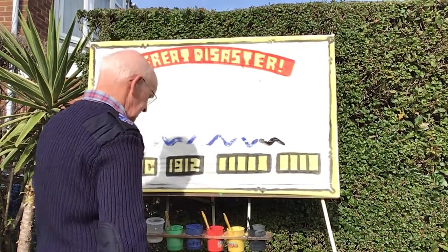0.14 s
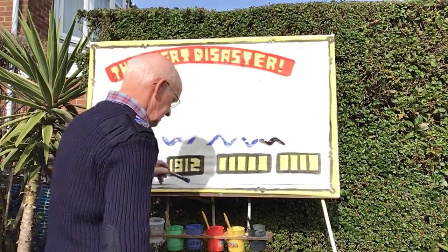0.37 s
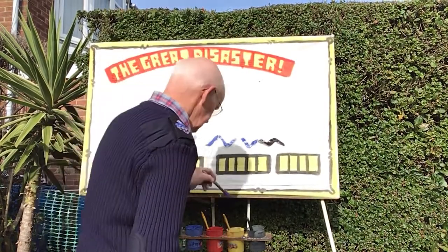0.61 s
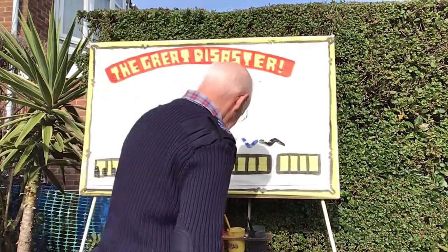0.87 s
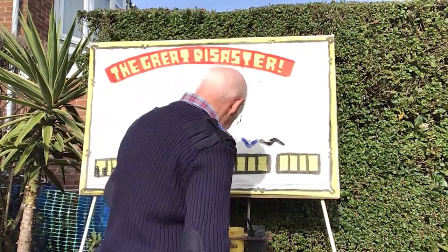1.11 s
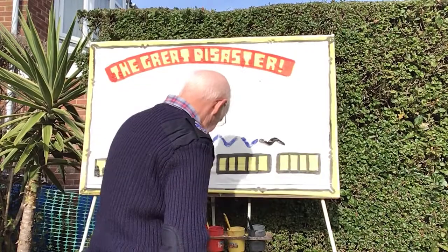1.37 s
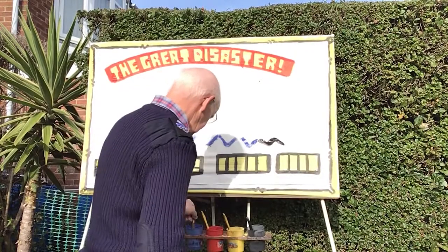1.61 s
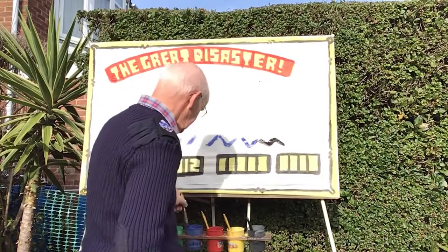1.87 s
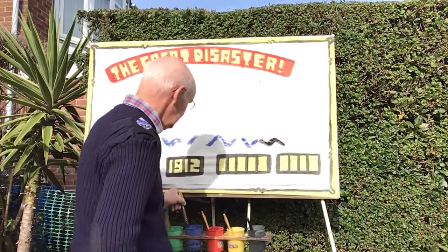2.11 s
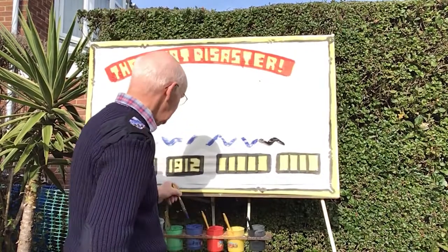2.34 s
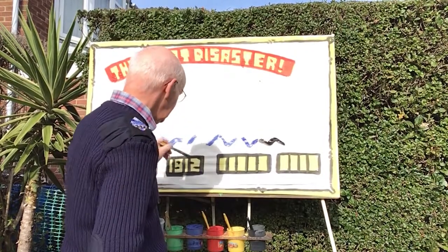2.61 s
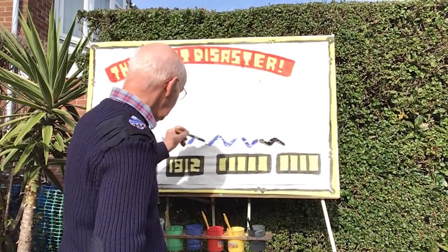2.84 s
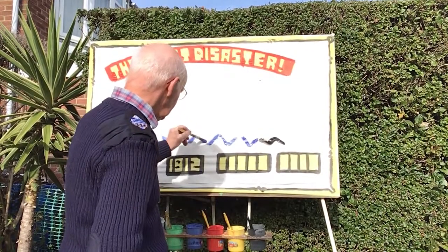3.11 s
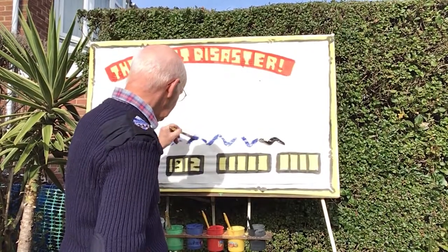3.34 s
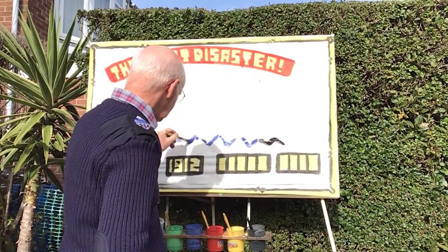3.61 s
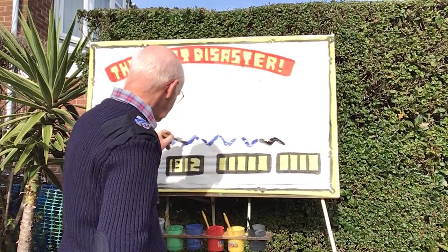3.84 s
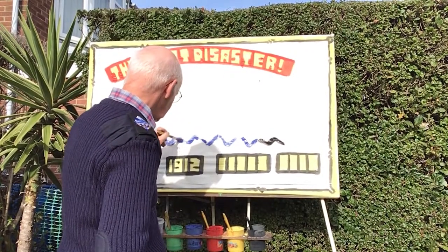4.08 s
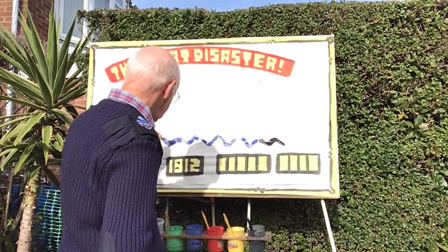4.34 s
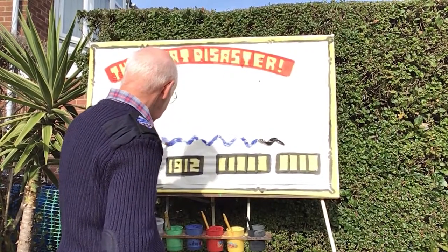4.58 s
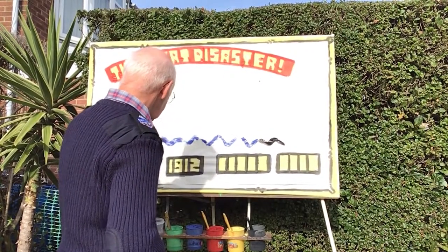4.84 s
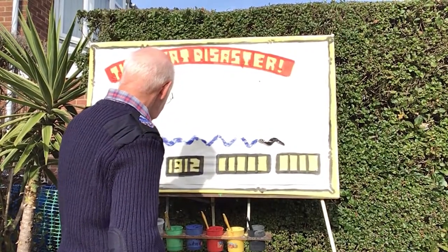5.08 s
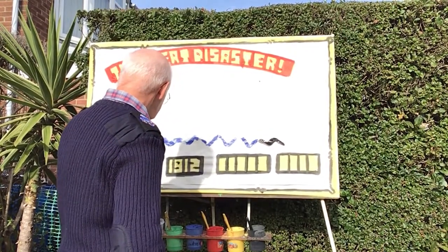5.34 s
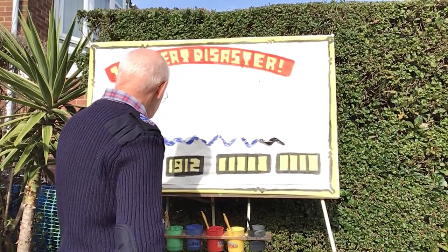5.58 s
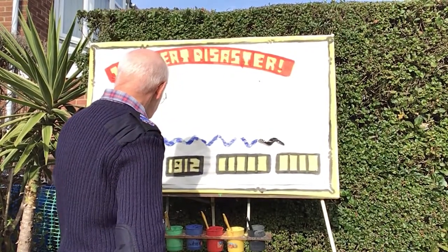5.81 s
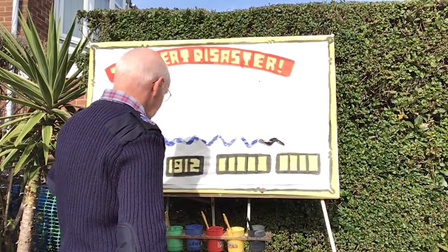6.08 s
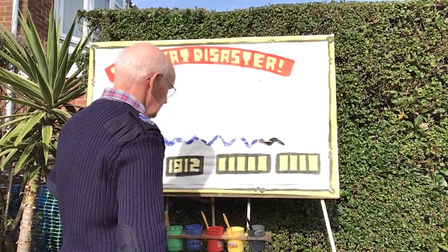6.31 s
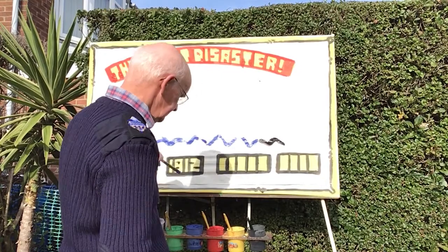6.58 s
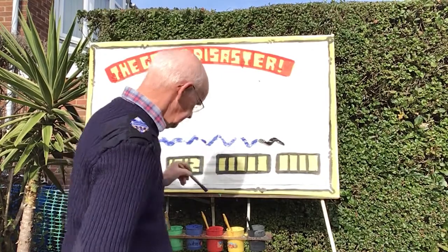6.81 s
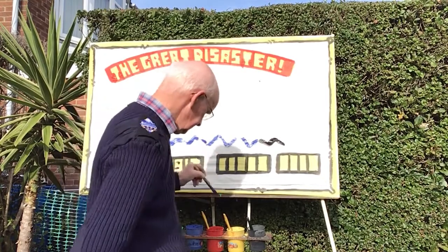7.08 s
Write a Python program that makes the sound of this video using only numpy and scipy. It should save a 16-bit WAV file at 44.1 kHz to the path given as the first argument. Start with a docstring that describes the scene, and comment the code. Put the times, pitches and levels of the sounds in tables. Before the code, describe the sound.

Several sparrows chirp busily and overlap in a garden hedge while wind buffets a bare microphone in the first half, then dies away.

```python
"""Sparrows chirp in a garden hedge, several at once, each call a gliding whistle with overtones.
Deeper in the hedge a flock of random bent chirps swells with the near birds; echoes blur them all.
Wind buffets the bare microphone, mostly in the first half, as bands of lumpy noise with sudden
eddies, then dies away. Far traffic and leaves are a faint steady wash of coloured noise."""
import sys
import numpy as np
from scipy import signal
from scipy.fft import rfft, irfft
from scipy.io import wavfile
from scipy.ndimage import uniform_filter1d

SR = 44100
rng = np.random.default_rng(int(sys.argv[2]) if len(sys.argv) > 2 else 0)


def undo_db(level):
    """Turn decibels back into plain size, where 20 dB means ten times bigger."""
    steps = np.asarray(level, float) / 20
    return 10 ** steps


def transcribe(signal):
    """Save signal, clipped to [-1, 1], as a 16-bit WAV file at the path in sys.argv[1]."""
    frames = np.atleast_2d(signal).T
    limited = np.clip(frames, -1, 1)
    pcm = np.round(limited * 32767).astype(np.int16)
    wavfile.write(sys.argv[1], SR, pcm)


N = 317079   # samples


def rms_one(x):
    """Scale to rms 1."""
    return x / np.sqrt(np.mean(x ** 2) + 1e-20)


def drift(rate_hz):
    """Random wandering: noise twice through a one-pole low-pass, rms 1."""
    r = np.exp(-2 * np.pi * rate_hz / SR)
    noise = rng.standard_normal(N + SR)
    return rms_one(signal.lfilter([1], [1, -2 * r, r * r], noise)[SR:])   # skips the filter's start


def band(low_hz, high_hz):
    """White noise between two edges, rms 1."""
    sos = signal.butter(2, [low_hz, high_hz], "band", fs=SR, output="sos")
    return rms_one(signal.sosfilt(sos, rng.standard_normal(N + 4000))[4000:])


def chirp(points, rasp, hiss, waver, overtone_db):
    """A whistle gliding through (s, Hz, dB) points; quick bends are roughest, slow glides somewhat less rough."""
    s, hz, db = np.transpose(points)
    t = np.arange(max(round(s[0] * SR), 0), min(round(s[-1] * SR), N))
    pitch = uniform_filter1d(np.interp(t / SR, s, hz), size=240, mode="nearest")   # rounds the corners
    octaves_per_s = np.sum(np.abs(np.diff(np.log2(hz)))) / (s[-1] - s[0])
    rough = np.clip(octaves_per_s / 9, .6, 1)
    phase = 2 * np.pi * np.cumsum(pitch * (1 + rough * waver[t])) / SR
    tone = np.sin(phase) * (1 + .3 * rough * rasp[t])
    low_note_db = -5.0 * np.log2(pitch / 3500)   # low notes are richer
    breath = .6 + 1.2 * (rough - .4) * hiss[t]
    for k in (2, 3, 4):
        heard = np.clip((15500 - k * pitch) / 500, 0, 1)   # overtones fade out from 15 to 15.5 kHz
        level = undo_db(overtone_db + low_note_db - 6.0 * (k - 2))
        tone += heard * level * np.sin(k * phase) * breath
    fade_in, fade_out = (t - t[0]) / SR / .013, (t[-1] - t) / SR / .008
    edge = np.clip(np.minimum(fade_in, fade_out), 0, 1)
    return t, tone * undo_db(np.interp(t / SR, s, db)) * edge


# long falling whistles, the last two overlapping: (start [s], length [s], level [dB])
FALLING_WHISTLES = [(-.1,0.153,-49.5),(1.17,0.14,-60),(1.39,0.222,-55.5),(1.865,0.165,-53),(2.865,0.15,-58.5),(3.88,0.19,-52),(4.807,0.15,-55.5),(5.488,0.154,-49),(7.012,.16,-56.5),(7.06,.129,-48.5)]
# their shared course, cut off at the length of each: (time after start [s], pitch [Hz], added level [dB])
FALL_COURSE = [(0,6450,-11),(.03,6150,-1),(.07,5400,2),(.128,4650,5.7),(0.249,4430,-20.5)]


def falling_whistles():
    """Long whistles follow one shared downward course, stopping it sooner or later."""
    after, hz, swell_db = np.transpose(FALL_COURSE)
    for s, d, db in FALLING_WHISTLES:
        t = np.append(after[after < d], d)
        yield -21, np.c_[s + t, np.interp(t, after, hz), db + np.interp(t, after, swell_db)]


# chirps that slide one way:
# (start [s], length [s], first pitch [Hz], last pitch [Hz], level [dB], overtone setting [dB])
SLIDING_CHIRPS = [(0,.04,3300,2590,-47,-31),(0.042,0.044,4700,6060,-55,-21),(0.294,.05,2650,3580,-58,-5.5),(0.504,0.037,3600,2770,-46,-24),(0.644,0.058,2450,2910,-50,-33),(.855,.03,5300,3740,-54,-25),(1.016,0.045,4800,2990,-59,-11),(0.287,.055,5470,6960,-54.5,-20),(.769,0.036,5670,5770,-46.5,-12),(.77,0.0374,2560,3020,-49.5,-7),
                  (0.912,0.055,2540,4150,-49,-47),(1.057,0.047,5830,4560,-49,-16),(1.873,.035,4986,4454,-46,-15),
                  (1.988,.05,3350,2640,-46.5,-41),(2.225,0.054,5900,6300,-58.5,-21),(2.361,0.051,3303,4400,-51.5,-11.5),
                  (2.994,0.0069,7290,8090,-32,-31),(3.002,0.028,6460,6064,-46,-14.5),(3.054,0.017,7950,6390,-40,-19),(3.229,0.046,4760,4750,-52.5,-31),(3.255,.03,4750,3000,-47.5,-32),
                  (3.298,0.058,3450,2780,-43.5,-26),(3.369,0.067,2550,3000,-49,-36),(3.504,0.041,5400,4430,-51.5,-20.5),(3.507,.05,2320,2720,-53.5,-35),(3.556,.065,2903,2464,-41,-28),
                  (3.944,0.037,3805,4720,-45,-29),(4.02,0.077,3050,2735,-53,-4.5),(4.077,.035,2574,3860,-52.5,-4.5),(4.098,.055,5230,3754,-44.5,-13),
                  (4.15,.075,3750,2650,-46.5,-21),(4.266,0.033,3500,2740,-60,-30),(4.635,0.089,2570,3880,-43.5,-19.5),(4.637,0.031,6380,6350,-48.5,-5.5),(5.077,0.0275,5790,4300,-50,-26),
                  (5.244,0.041,3150,2810,-47,-35),(5.286,0.056,3530,4610,-59,-37),(5.428,0.039,2835,3160,-49.5,-1),
                  (5.65,0.083,2480,3230,-61.5,-31.5),(5.718,.05,4120,5470,-58,-26),(5.792,0.04,5500,6630,-65,-20),(5.737,0.081,2524,3030,-51,-30),(5.945,0.034,3000,1780,-51,-15),(5.998,0.041,1800,2800,-59,-12),(5.99,0.074,4260,2700,-49.5,-20),
                  (6.06,0.033,4400,4440,-39,-24),(6.088,0.063,4200,2986,-44.5,-27),(6.166,0.038,3530,2800,-50.5,-38),(6.192,0.02,3900,4000,-53,-38),(6.211,0.034,4200,6750,-54,-40),
                  (6.306,.035,3600,4520,-48.5,-29),(6.338,0.051,3237,5530,-52,-30),(6.646,.05,4670,3240,-51.5,-38),
                  (7.079,0.093,2673,2850,-53,-18)]


def sliding_chirps():
    """The pitch glides up or down, lingering in the upper part of its range."""
    linger = 0.62   # halfway through, share of the way from the lower end to the higher
    for s, d, first, last, db, overtone_db in SLIDING_CHIRPS:
        middle = min(first, last) + linger * abs(last - first)
        yield overtone_db, [(s, first, db - 2), (s + d / 2, middle, db), (s + d, last, db)]


# chirps that arch up and down:
# (start [s], length [s], foot pitch [Hz], top pitch [Hz], level at the top [dB], overtone setting [dB])
ARCHING_CHIRPS = [(0.33,0.076,3200,5380,-43,-18),(0.411,0.065,2483,3740,-45.5,-12.5),(0.443,.066,3600,5200,-42.5,-56),(0.559,0.076,2900,4150,-48,-23),
                  (0.672,0.078,2650,3450,-52.5,-33),(0.784,0.071,3100,5050,-45.5,-19),(0.848,.065,2514,3780,-44.5,-70),(1.144,.078,2900,4760,-40.5,-19),
                  (1.229,0.065,2694,4100,-38.5,-30),(1.424,0.034,3290,4170,-47.5,-20),(1.478,.06,2500,3500,-52,-41),(1.641,0.078,4002,5150,-56,-21),
                  (1.713,0.044,3500,4270,-50,-20),(1.752,.06,3900,4960,-44.5,-19),(1.761,0.05,5000,5860,-54,-13),(1.829,.05,4500,5940,-53.5,-16),(1.886,0.091,3000,4100,-48.5,-18),(1.943,0.062,3100,4162,-44,-35),
                  (2.069,0.085,2400,4910,-52.5,-21),(2.168,.085,2697,3427,-46,-23),(2.27,.058,3500,5900,-54.5,-18),(2.396,0.052,3141,4205,-44,-16.5),(2.441,.085,2822,3768,-39.5,-30),
                  (2.571,.08,3353,3836,-53,-21),(2.654,0.05,2778,3070,-46,-40.5),(2.732,.074,4300,6070,-53.5,-20.5),(2.827,.08,3950,4640,-53,-34),
                  (2.98,0.088,3200,5590,-46,-8.5),(3.096,0.042,3167,4030,-44,-17),(3.344,0.032,2854,3605,-45.5,-22),(3.379,.04,3000,4550,-52.5,-36),(3.431,0.078,2850,3530,-49.5,-37.5),
                  (3.6,0.061,3100,5046,-42.5,-18),(3.646,0.052,2900,3750,-43,-29),(3.69,0.038,2500,3920,-40.5,-30),(3.831,0.084,2900,5710,-49.5,-18.5),(3.951,.075,2700,4440,-51.5,-22),(4.371,.075,3190,4673,-46,-14.5),
                  (4.438,0.084,2790,3450,-48,-15),(4.53,.075,3300,4470,-48.5,-25),(4.594,.055,3500,4700,-51,-23),(4.659,.055,3200,5210,-47.5,-20),(4.706,.066,2703,4550,-44.5,-35),(4.853,0.097,3050,3940,-55.5,-33),
                  (4.949,.055,2800,3810,-51,-26),(5.195,0.074,3600,6385,-55,-34),(5.458,.068,2500,4350,-45.5,-15),(5.528,.075,2700,4000,-41.5,-39),(5.79,0.11,2900,3730,-52.5,-22),(5.886,.05,4200,5470,-60,-18),
                  (5.874,0.096,3100,4850,-48.5,-15),(5.957,0.0453,3000,3450,-43.5,-29),(6.236,0.085,3880,5600,-53,-26),(6.376,.062,2900,5380,-44.5,-16),
                  (6.458,0.062,2600,3800,-46,-40),(6.579,.06,3350,4840,-49,-24),(6.649,0.074,2717,3380,-47.5,-39),(6.708,.062,2670,3670,-46,-43),
                  (6.817,.045,4000,5180,-60,-18),(6.803,.048,4700,6100,-60,-30),(6.903,0.047,3100,4410,-53,-14),(7.016,0.056,2600,5470,-53,-21)]


def arching_chirps():
    """The pitch leaps to a rounded top and drops to its foot, loudest at the top."""
    top_at = 0.48   # share of the length
    share = np.array([0, top_at / 2, top_at, (1 + top_at) / 2, 1])
    height = np.array([.12, 0.62, 1, 0.62, 0])   # share of the way from foot to top
    swell_db = np.interp(share, share[::2], [-5, 0, -2])
    for s, d, foot, top, db, overtone_db in ARCHING_CHIRPS:
        yield overtone_db, np.c_[s + d * share, foot + (top - foot) * height, db + swell_db]


# low whistles: (start [s], length [s], base pitch [Hz], level [dB])
LOW_WHISTLES = [(1.053,.15,2615,-54),(2.958,0.17,2557,-52),(5.071,0.21,2540,-53.5),(6.565,.18,2423,-56.5)]
# their nearly level course with a droop at the end: (share of length, pitch factor, added level [dB])
LOW_COURSE = [(0,1.09,-5.5),(.28,.97,1.5),(0.618,1.06,3.7),(1,0.77,-10)]


def low_whistles():
    """Long notes that hold near one pitch and droop at the end."""
    for s, d, pitch, db in LOW_WHISTLES:
        yield -18, [(s + share * d, pitch * factor, db + more_db) for share, factor, more_db in LOW_COURSE]


def sparrows():
    """The near birds, chirp by chirp; level and pitch tremble quickly."""
    out, rasp, hiss = np.zeros(N), band(297.7, 900), drift(1100)
    waver = .022 * drift(45) + .013 * drift(250)   # share of the pitch
    calls = [*falling_whistles(), *sliding_chirps(), *arching_chirps(), *low_whistles()]
    for overtone_db, points in calls:
        t, sound = chirp(points, rasp, hiss, waver, overtone_db)
        out[t] += sound
    return out * undo_db(2.0 * drift(50))


def flock(near, count=450):
    """Birds deeper in the hedge: overlapping random bent chirps whose chatter swells with the near calls."""
    out, rasp, hiss = np.zeros(N), band(250, 1000), drift(1500)
    waver = .05 * drift(35) + .012 * drift(250)   # share of the pitch
    for when, length, first, middle, last, level in rng.random((count, 6)):
        s, d = when * (N / SR - .01), .02 + 0.066 * length
        start = (s, 2200 + 2800 * first, 0)
        bend = (s + .5 * d, 2800 + 3200 * middle, 0)
        end = (s + d, 1800 + 2800 * last, 0)
        t, sound = chirp([start, bend, end], rasp, hiss, waver, overtone_db=-23)
        out[t] += sound * undo_db(-10.5 * level)
    excitement = np.sqrt(np.maximum(uniform_filter1d(near ** 2, size=3500), 0))
    return rms_one(out) * (undo_db(-10.5) * excitement + undo_db(-77.0))   # a faint murmur stays between calls


# early reflections: (delay [s], gain against a diffuse tail of unit energy)
EARLY_ECHOES = [(.0023, 0.39), (.0061, -1.3), (0.012, .7), (0.02, -.6), (0.03, 0.34)]


def garden(x):
    """Leaves and walls scatter the calls: hard early echoes blur each whistle, over a diffuse tail, dull on top."""
    t60_s, wet_db = .36, -9.6
    t = np.arange(round(.4 * SR)) / SR
    build_up = np.clip(t / 0.031, 0, 1)
    tail = rng.standard_normal(len(t)) * undo_db(-60 * t / t60_s) * build_up
    tail /= np.sqrt(np.sum(tail ** 2))
    for delay_s, gain in EARLY_ECHOES:
        tail[round(delay_s * SR)] += gain
    tail = signal.lfilter(*signal.butter(1, 7000, fs=SR), tail)
    return x + undo_db(wet_db) * signal.fftconvolve(x, tail)[:N]


def above_corner(hz, corner_hz):
    """Turbulence is flat up to a corner and falls steeply above it."""
    return 1 / np.sqrt(1 + (hz / corner_hz) ** 9.9)


# wind strength at the microphone: (time [s], rumble level per band [dB])
GUSTS = [(0.0,-40.5),(.14,-65.5),(.44,-34),(.51,-40.5),(1.39,-42.5),(2.35,-56.5),(2.42,-57),(2.53,-38.5),(2.67,-41),(2.9,-44),(2.97,-50),(3.05,-40.5),
         (3.42,-39.5),(3.58,-54),(3.7,-43.5),(4.1,-43.5),(4.28,-83),(5.41,-65),(7.19,-81)]
# sudden eddies: (time [s], peak level per band [dB], corner above which the spectrum falls [Hz],
# base length, stretched in the low bands [s])
EDDIES = [(.306,-46.5,386,0.013),(0.355,-42,378,.012),(0.416,-35.5,520,0.018),(0.432,-33,620,0.013),(0.88,-28,262,0.0081),
          (0.988,-41.5,247,0.08),(1.074,-41,360,0.0043),(1.15,-37,460,0.024),(1.174,-36,458,0.01),(1.198,-33,338,0.0051),(1.235,-35,408,0.011),
          (1.311,-44,450,0.0094),(1.389,-29.5,459,0.013),(1.435,-34,367,0.013),(2.14,-46.5,316,0.0077),(2.397,-36.5,613,0.013),(2.429,-36,400,0.011),
          (2.646,-26.5,473,.011),(2.719,-29,367,0.017),(2.75,-22,747,0.008),(2.864,-36,443,.012),(2.912,-41.5,293,0.0094),(3.002,-37.5,650,0.0048),(3.156,-36,453,0.013),
          (3.217,-28.5,510,0.012),(3.242,-20.5,472,0.0051),(3.337,-39,487,0.0099),(3.372,-38,450,0.0094),(3.407,-27.5,442,0.014),(3.692,-29,350,0.012),(3.826,-36,405,0.0053),
          (4.418,-49,111.2,0.012),(4.718,-45,106,0.0081),(5.489,-45.5,133.7,0.026)]


def wind():
    """Lumpy turbulence noise at the microphone; faster air is louder and has a higher corner."""
    rumble_db = np.interp(np.arange(N) / SR, *np.transpose(GUSTS))
    lumps_db, snaps, out = 3.2 * drift(15), drift(78), 0
    corner_hz = 190 * undo_db(0.29 * (rumble_db + 30.5) + 0.29 * lumps_db)
    edges = 45 * 2 ** np.arange(0, 6, .5)   # half-octave bands
    for low, high in zip(edges, edges[1:]):
        hz = np.sqrt(low * high)
        level = undo_db(rumble_db + lumps_db + 2.0 * drift(9.2)) * above_corner(hz, corner_hz)
        for s, db, eddy_hz, length in EDDIES:
            # the small, high swirls arrive first and pass quickly; the low ones roll on after
            width = length * (1 + 60 / hz)
            t = np.arange(max(round((s - .1) * SR), 0), min(round((s + .2) * SR), N))
            swell = np.exp(-((t / SR - s - .006 - 1.1 / hz) / width) ** 2)
            level[t] += undo_db(db + rng.normal(0, 1.47)) * above_corner(hz, eddy_hz) * swell
        crackle = undo_db(1.23 * np.log2(hz / 45) * snaps)   # small swirls come in sharp separate knocks
        out = out + level * crackle * band(low, high)
    return out


# colour of the far wash: (frequency [Hz], relative level [dB])
FAR_COLOUR = [(24, -26.5), (40, 7.5), (114, 2), (207, -5), (2220, -21.5), (3470, -31.5), (4800, -22.5),
              (7160, -27.5), (15500, -38.5)]


def far_noise():
    """Distant traffic and leaves merge into a steady wash: noise coloured by a spectrum curve."""
    level_db = -60.5
    hz = np.maximum(np.fft.rfftfreq(N, 1 / SR), 1)
    colour_hz, colour_db = np.transpose(FAR_COLOUR)
    colour = undo_db(np.interp(np.log(hz), np.log(colour_hz), colour_db))
    wash = irfft(rfft(rng.standard_normal(N)) * colour, N)
    return rms_one(wash) * undo_db(level_db + 1.0 * drift(5.6))


def scene():
    """Birds in the garden, wind and far noise at one microphone."""
    near = sparrows()
    # such small throats radiate little below their lowest notes
    throat = signal.butter(4, 1950, "high", fs=SR, output="sos")
    birds = signal.sosfilt(throat, near + flock(near))
    return (garden(birds) + wind() + far_noise())[None]


def top_cut(x):
    """Nothing passes above the cut-off."""
    return signal.sosfilt(signal.butter(12, 15690, fs=SR, output="sos"), x)


def record(dry):
    """The microphone cuts the lowest bass steeply, below 76 Hz."""
    mix = signal.sosfilt(signal.butter(4, 76, "high", fs=SR, output="sos"), dry)
    return top_cut(mix)


dry = scene()
out = record(dry)
transcribe(out)
```